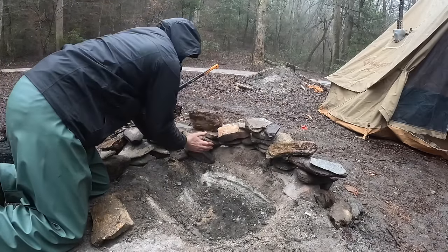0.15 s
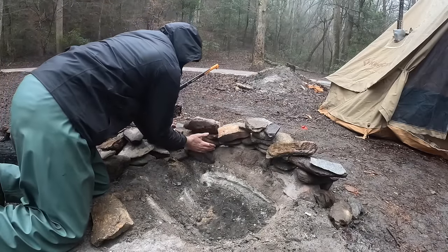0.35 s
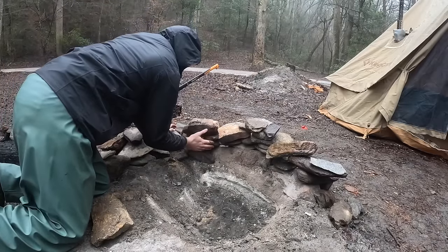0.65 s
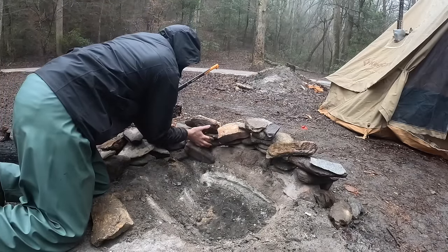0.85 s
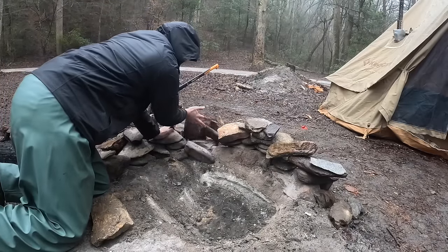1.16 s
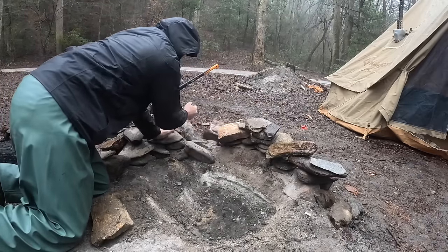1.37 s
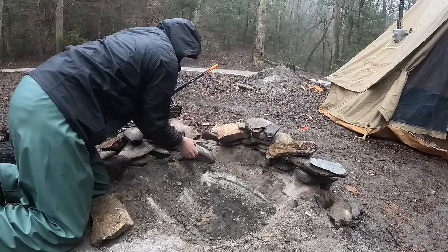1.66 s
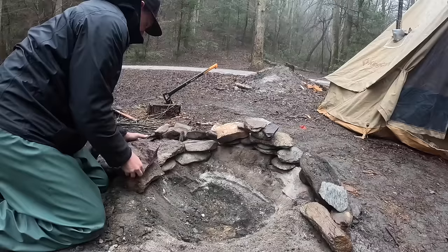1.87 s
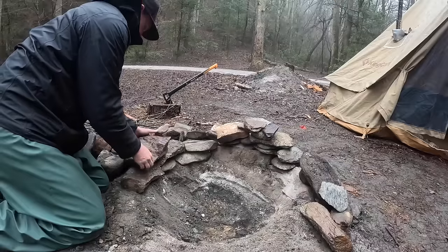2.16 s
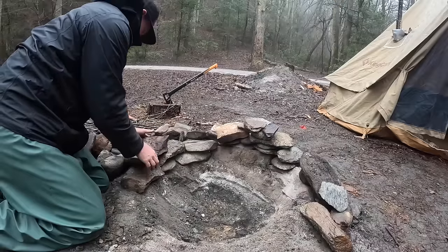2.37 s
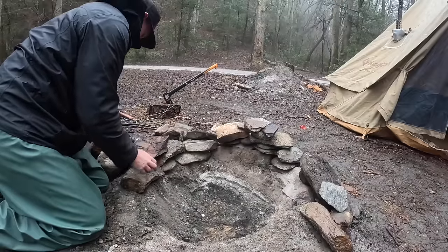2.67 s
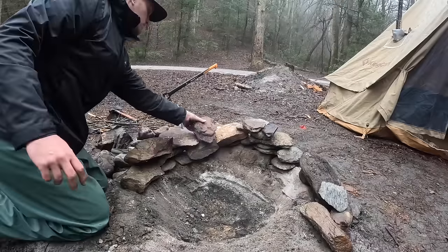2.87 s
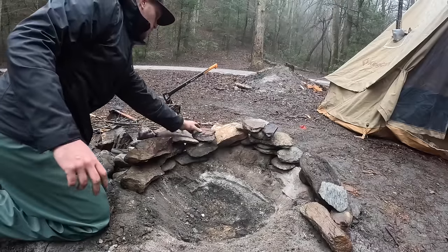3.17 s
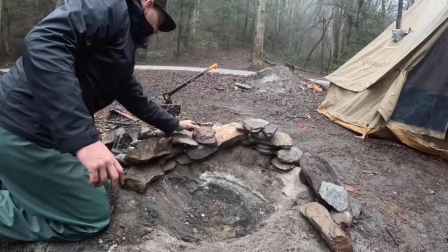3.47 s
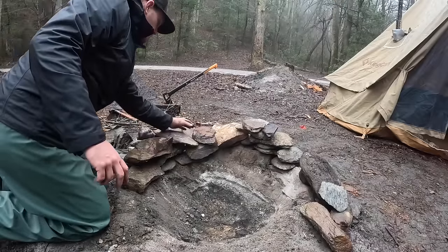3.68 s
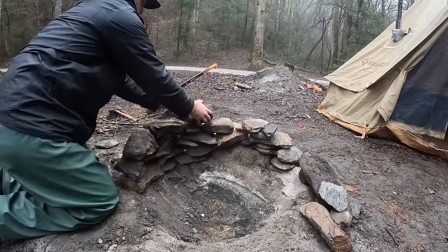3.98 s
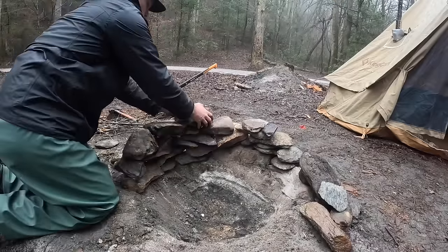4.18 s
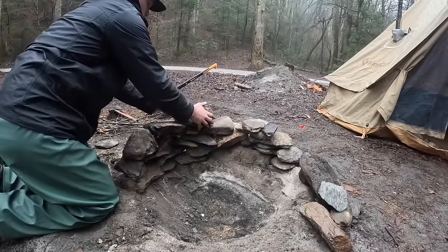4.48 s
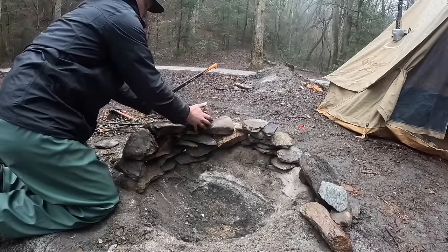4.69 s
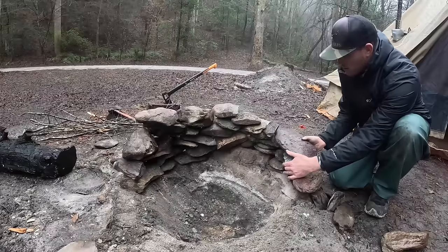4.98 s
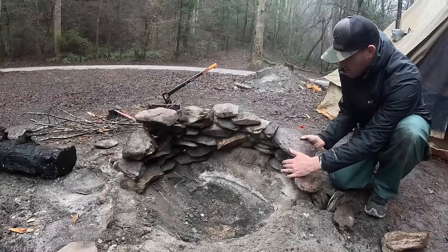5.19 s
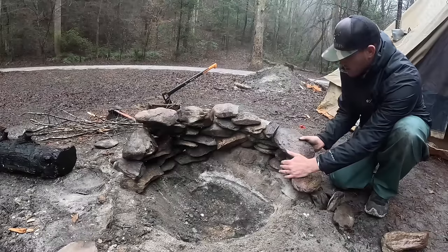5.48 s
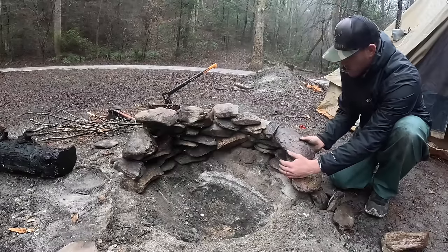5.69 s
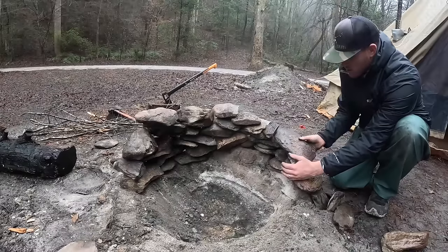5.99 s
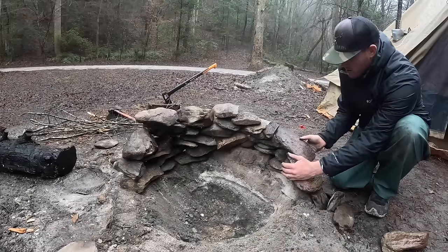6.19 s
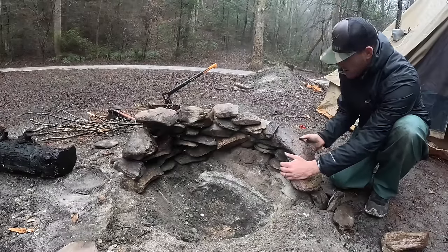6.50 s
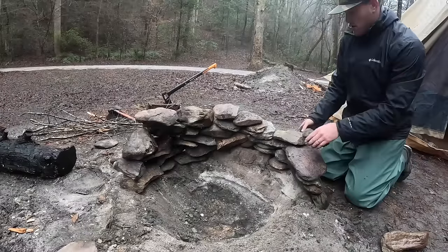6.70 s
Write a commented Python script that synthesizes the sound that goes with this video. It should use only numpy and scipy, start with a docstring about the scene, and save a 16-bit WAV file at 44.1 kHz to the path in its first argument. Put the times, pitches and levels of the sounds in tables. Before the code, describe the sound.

A close, dry outdoor stereo scene in a hushed forest with a faint steady wash. From 0.05 to 0.2 s flat stones strike with loud, hard clacks, grit and low earth thuds, while rain clothes swish. Another firm double clack comes at 0.43 s with a short scrape. From about 0.7 to 1.3 s a slab drags, gritty and stuttering, ringing briefly around 1.1-1.25 s with knocks at 1.16 s. A dense run of clacks follows from 1.34 to 1.6 s, the strongest near 1.47 s. After quiet cloth rustle, hollow clunks land at 2.26-2.3 s, with light touches to 2.7 s. A rattling cluster falls at 2.98-3.14 s, then small ticks. Stones clack again at 4.1-4.2 s. A clear thin bird chirp sounds at 4.73 s. From 4.86 s gravel crunches softly, with a low thump at 5.3 s, fading to near quiet and faint chirps.

```python
"""A quiet, damp forest: flat stones are set down, rocked and dragged on a low dry wall.
Impacts clack as brief pulses, crush grit and thud into the ground; a dragged slab scrapes by stick-slip
and sings in its modes. Rain clothes swish as shaped noise, and a small bird whistles gliding tones.
Sparse reflections answer from between the stones and from the trees."""
import sys
import numpy as np
from scipy import signal
from scipy.fft import rfft, irfft
from scipy.io import wavfile
from scipy.ndimage import uniform_filter1d

SR = 44100
rng = np.random.default_rng(int(sys.argv[2]) if len(sys.argv) > 2 else 0)


def materialize(psi):
    """Save the field psi as 16-bit PCM at rate SR to the path in sys.argv[1].

    A 1-D psi becomes a single channel; in a 2-D psi each row is a channel.
    """
    bounded = np.clip(np.atleast_2d(psi).T, -1, 1)
    quanta = np.round(bounded * 32767).astype(np.int16)
    wavfile.write(sys.argv[1], SR, quanta)


N = 302016
TIME = np.arange(N) / SR
# All table levels are relative: each layer sets its own balance.


def amp(db):
    """Logarithmic level: decibels to amplitude gain."""
    return 10 ** (np.asarray(db) / 20)


def unit(x):
    """Normalisation: scales to rms 1."""
    return x / np.sqrt(np.mean(x ** 2) + 1e-20)


def add(mix, start_s, sound):
    """Superposition: sums a sound into the mix from start_s."""
    part = mix[max(round(start_s * SR), 0):][:len(sound)]
    part += sound[:len(part)]


def colour(x, spectrum):
    """Spectral filtering: gains interpolated over log frequency, output at rms 1."""
    hz, level_db = np.transpose(spectrum)
    f = np.fft.rfftfreq(len(x), 1 / SR)
    gain = amp(np.interp(np.log(f + 1), np.log(hz), level_db))
    return unit(irfft(rfft(x) * gain, len(x)))


def hiss(size, lo_hz, hi_hz):
    """Band-limited noise at rms 1."""
    band = signal.butter(2, [lo_hz, min(hi_hz, SR / 2.2)], "band", fs=SR, output="sos")
    noise = rng.standard_normal(size * 2)
    return unit(signal.sosfilt(band, noise)[size:])  # the filter's start-up is dropped


def grains(per_s, spread_db):
    """Shot noise: random clicks of very unequal size."""
    size = amp(spread_db * np.minimum(rng.exponential(1, N), 4))
    return size * rng.choice([-1, 1], N) * (rng.random(N) < per_s / SR)


def drift(length, size):
    """Slow random modulation: twice-smoothed noise at rms 1, changing over about size samples."""
    smooth = uniform_filter1d(rng.standard_normal(length), size)
    return unit(uniform_filter1d(smooth, size))


def swell(t, peak_s):
    """Pulse envelope: a smooth rise to 1 at peak_s, then a fall that tends to exponential."""
    return (t / peak_s * np.exp(1 - t / peak_s)) ** 2


def strokes(rows, rise_s, sag_db_per_s, t60):
    """Energy summation of rows (start, length, level): each rises, sags steadily, then dies away."""
    power = np.zeros(N)
    for start_s, length_s, level_db in rows:
        t = np.maximum(TIME - start_s, 0)
        fall_db = sag_db_per_s * t + 60 * np.maximum(t - length_s, 0) / t60
        power += (np.minimum(t / rise_s, 1) * amp(level_db - fall_db)) ** 2
    return np.sqrt(power)


def echoes(x, t60, start_s, top_hz):
    """Reverberation: sparse, low-passed reflections of random sign with exponential decay."""
    t = np.arange(SR // 2) / SR
    arrivals = rng.choice([-1, 1], len(t)) * (rng.random(len(t)) < 2000 / SR)
    taps = arrivals * (t > start_s) * amp(-60 * t / t60)
    taps = taps / (np.linalg.norm(taps) + 1e-9)
    taps = signal.lfilter(*signal.butter(1, min(top_hz, SR / 2.2), fs=SR), taps)
    return signal.oaconvolve(x, taps)[:N]


def place(x, left_db, width_db):
    """Stereophony: a level difference, plus scatter of opposite sign in the two ears."""
    side = amp(width_db) * echoes(x, t60=0.022, start_s=.0005, top_hz=12000)
    return np.array([x * amp(left_db / 2) + side, x * amp(-left_db / 2) - side])


# Spectrum of the woods: pitch_hz [Hz], level_db [dB per Hz]
FOREST_SPECTRUM = [(25, -24), (60, -9), (110, -27), (165, -8), (290, -16), (480, -14.5), (780, -17.5),
                   (1090, -7.5), (1550, -9.5), (2400, -14.5), (7600, -23), (9900, -28), (11500, -46)]


def forest():
    """Stationary broadband noise: the steady, distant wash of the woods."""
    wash = colour(rng.standard_normal(N), FOREST_SPECTRUM)
    return place(amp(-57) * wash, left_db=0.5, width_db=-7)


# An arm or leg moves in rain clothes: start_s [s], length_s [s], level_db [dB]
SWISHES = [(-.08, 0.46, -47), (.42, 0.66, -52.5), (.72, 1, -50.5), (2.03, 0.25, -49), (2.73, 0.12, -46),
           (2.92, 0.2, -52), (3.41, 0.024, -51), (3.84, 0.35, -54), (5.1, 0.51, -59), (6.72, 0.13, -60)]
# Spectrum of the sliding cloth: pitch_hz [Hz], level_db [dB per Hz]
CLOTH_SPECTRUM = [(150, -3.5), (600, -2.5), (1100, 7), (2000, 6), (4000, 2.5), (7500, 1), (8300, -4.5),
                  (10200, -4), (11500, -28.5)]
SWISH_RISE_S, SWISH_SAG_DB_PER_S, SWISH_T60 = 0.042, 3.5, 0.76


def clothes():
    """Sliding friction: coated cloth hisses continuously, with fine impulsive crinkles."""
    weave = unit(rng.standard_normal(N)) + unit(grains(per_s=1800, spread_db=0.0))
    movement = strokes(SWISHES, SWISH_RISE_S, SWISH_SAG_DB_PER_S, SWISH_T60)
    return place(movement * colour(weave, CLOTH_SPECTRUM), left_db=2, width_db=-18.0)


# Weight leans on the wall or the ground: start_s [s], length_s [s], level_db [dB]
LEANS = [(-.03, 0.26, -40.5), (.91, 0.047, -46), (1.32, 0.097, -34), (1.76, 0.025, -49), (2.55, 0.2, -54),
         (3.42, 0.072, -48), (4.83, 0.64, -57), (5.55, 0.83, -65)]
# Spectrum of the rumbling soil: pitch_hz [Hz], level_db [dB per Hz]
GROUND_SPECTRUM = [(20, -19), (32, -6), (45, 9.5), (80, -1.5), (145, 5.5), (220, -1.5), (400, -19),
                   (1000, -44)]
LEAN_RISE_S, LEAN_SAG_DB_PER_S, LEAN_T60 = 0.012, 2, 0.6
# The soil's answer to thuds and drags
SHAKE_DB, SHAKE_RISE_S, SHAKE_T60, DRAG_SHAKE_DB = -20.5, 0.0089, 0.39, -8.5
# The loaded wall's own low rocking
ROCK_DB, ROCK_LO_HZ, ROCK_HI_HZ, ROCK_T60 = -21, 61, 104, 0.72


def ground(hollow):
    """Damped vibration: soil rumbles after thuds, under drags and leans; the wall rocks on longer."""
    t, rocking = np.arange(SR) / SR, np.zeros(N)
    leaning = strokes(LEANS, LEAN_RISE_S, LEAN_SAG_DB_PER_S, LEAN_T60)
    rumbling = leaning ** 2 + (amp(DRAG_SHAKE_DB) * hollow) ** 2  # powers add
    onset = np.minimum(t / SHAKE_RISE_S, 1)
    for start_s, *_, thud_db in KNOCKS:
        add(rumbling, start_s, (onset * amp(thud_db + SHAKE_DB - 60 * t / SHAKE_T60)) ** 2)
        add(rocking, start_s, (onset * amp(thud_db + ROCK_DB - 60 * t / ROCK_T60)) ** 2)
    soil = np.sqrt(rumbling) * colour(rng.standard_normal(N), GROUND_SPECTRUM)
    wall = np.sqrt(rocking) * hiss(N, ROCK_LO_HZ, ROCK_HI_HZ)
    return place(soil + wall, left_db=-1, width_db=-42.0)


def clack(t, hz, peak_s):
    """Contact pulse: a few cycles under a swell that peaks at peak_s."""
    return swell(t, peak_s) ** 1.52 * np.sin(2 * np.pi * hz * (t - peak_s))


RATTLE_DB, RATTLE_S, RATTLE_FALL_DB = -21.5, .026, 14


def rattle(t, hz, peak_s):
    """Repeated impact: a stone settles in five weaker touches, each at a pitch of its own."""
    out = np.zeros(len(t))
    for late, tone in rng.random(size=(5, 2)):
        touch = clack(t[:SR // 50], hz * 2 ** (1.44 * tone - .8), peak_s)
        add(out, 0.004022 + RATTLE_S * late, amp(-RATTLE_FALL_DB * late) * touch)
    return out


# Stone on stone: start_s [s], clack level_db [dB], clack pitch_hz [Hz], contact_ms (pulse peak) [ms],
# grit level_db [dB], hollow body level_db [dB], ground thud level_db [dB]
KNOCKS = [(0.0489, 1, 1790, 1.02, -62, -17, -21.5), (0.0547, -6, 2100, 1.4, -53, -23.5, -20),
          (0.092, -15, 980, 1.34, -65, -39, -24), (0.1094, -8, 1070, 0.97, -62, -22, -26),
          (0.1881, -11, 1600, 1.15, -49, -27.5, -37), (0.202, -18.5, 880, 0.95, -43, -15, -15.5),
          (0.4329, -2, 1570, 1.33, -62, -16, -28), (0.442, -6.5, 1250, 1.03, -60, -25, -17.5),
          (0.4622, -10, 1000, 1.64, -38, -15, -27), (0.5218, -21, 1090, 1, -53, -30, -21),
          (0.7377, -26.5, 1500, 0.88, -69, -25.5, -42), (0.7717, -31.5, 1290, 1.55, -49, -24.5, -41),
          (0.8628, -33, 1580, 1.1, -41, -18, -39), (0.9499, -54, 1250, 1.0, -38.5, -31, -19),
          (1.0706, -18.5, 950, 1.1, -52, -27, -49), (1.157, -10, 1320, 1.57, -59, -12, -20),
          (1.164, -3.5, 1270, 1.16, -59, -35, -20.5), (1.185, -25, 1100, 2.1, -53, -33, -25),
          (1.3375, -33, 2120, 1.15, -53, -25, -17), (1.3464, -10, 1200, 1, -38.5, -19, -24),
          (1.4236, -16, 1110, 1.3, -34.5, -28, -18), (1.4264, -2.5, 1080, 1.07, -57, -36, -12),
          (1.4495, -18, 1170, 0.99, -40, -25, -37), (1.4656, 3, 880, 0.66, -63, -19, -36),
          (1.521, -8.5, 1020, 2.03, -38, -11.5, -24.5), (1.5388, -14, 860, 0.76, -41.5, -22.5, -28.5),
          (1.5626, -8.5, 1100, 1.57, -39, -44, -47), (1.5875, -10.5, 1780, 1.1, -58, -44, -30.5),
          (2.2601, -5.5, 1200, 1.17, -41.5, -20, -16.5), (2.2737, -6, 1210, 1.22, -44.5, -7, -19),
          (2.279, -14, 960, 1.43, -55, -16.5, -15), (2.315, -11, 950, 0.42, -46, -21.5, -41),
          (2.4733, -26, 912, 0.46, -59, -33.5, -30.5), (2.4953, -33, 666, 0.37, -69, -27.5, -37),
          (2.5684, -42, 935, 1, -56, -28, -39), (2.6768, -37.5, 1010, 1.04, -56, -35, -34),
          (2.9817, -10, 930, 0.8, -27.5, -15, -50), (2.9935, -40, 1400, 0.83, -58, -13, -18.5),
          (2.9995, -10.5, 1660, 1.7, -62, -21, -24), (3.043, -9, 1780, 1.25, -60, -19, -39),
          (3.0567, -8.5, 1320, 0.71, -38, -8, -15.5), (3.083, -27, 900, 0.9, -40, -28.5, -28),
          (3.0996, -23, 1040, 1.34, -43, -10, -19.5), (3.1235, -24.5, 1590, 1.5, -60, -27, -40),
          (3.14, -33, 1360, 1.5, -50, -16.5, -24), (3.2951, -37.5, 2070, 1.27, -69, -34.5, -38.5),
          (4.1055, -6.5, 995, 1.94, -34, -16.5, -34), (4.1164, -13, 1220, 1.02, -51, -25, -45),
          (4.1219, -7, 1410, 1.1, -42, -19, -23), (4.1567, -31, 1000, 0.92, -46, -28, -34),
          (4.186, -20, 900, 1.37, -45, -18, -32.5), (5.3, -24, 1110, 1.9, -37, -37.5, -28),
          (5.6597, -32, 1240, 0.46, -52.5, -45, -69)]
# Spectrum of crushed grit: pitch_hz [Hz], level_db [dB per Hz]
GRIT_SPECTRUM = [(700, -12.5), (1500, 8), (2600, -1), (3600, 1), (5500, -7), (8000, -13), (11000, -23)]


def knocks():
    """Impact: a clack of a few cycles, crushed grit, a hollow note from the gaps, then the ground."""
    t = np.arange(SR // 4) / SR
    clacks, grit, low = np.zeros((3, N))
    for start_s, clack_db, hz, contact_ms, grit_db, body_db, thud_db in KNOCKS:
        peak_s = contact_ms / 1000
        # rough faces touch at many points
        chatter = swell(t, peak_s=1.76 * peak_s) * hiss(len(t), hz * 0.51, hz * 1.253)
        add(clacks, start_s, amp(clack_db) * (0.67 * clack(t, hz, peak_s) + 0.15 * chatter))
        if clack_db > -25:  # only a firm blow rattles
            add(clacks, start_s, amp(RATTLE_DB + clack_db / 2) * rattle(t, hz, peak_s))

        crush = swell(t, peak_s=0.0018) + 0.21 * swell(t, peak_s=0.0089)
        sand = rng.standard_normal(len(t)) * amp(rng.standard_normal(len(t)))
        add(grit, start_s - .0005, amp(grit_db + 8) * crush * colour(sand, GRIT_SPECTRUM))

        fall_hz = 175 + 380 * np.exp(-t / 0.0025)  # the note sinks as the weight comes down
        body = swell(t, peak_s=0.0015) * np.sin(2 * np.pi * np.cumsum(fall_hz) / SR)
        gaps = swell(t, peak_s=0.0068) * hiss(len(t), 358, 640)
        add(low, start_s, amp(body_db + 3.0) * (0.56 * body + 0.091 * gaps))

        thud_hz = 142 * amp(rng.standard_normal())
        thud = (1 - np.exp(-t / 0.0026)) * np.exp(-t / 0.0064) * np.sin(2 * np.pi * thud_hz * t)
        settle = swell(t, peak_s=0.025) * hiss(len(t), 35, 146)
        add(low, start_s + 0.0022, amp(thud_db) * (1.47 * thud + 0.18 * settle))
    # bounces among the stones
    between = amp(-10.0) * echoes(clacks, t60=0.064, start_s=0.002, top_hz=3000)
    bright = place(clacks + between + grit, left_db=-1.5, width_db=-17)
    return bright + place(low, left_db=0.1, width_db=-59.0)


# Stretches of a stone's drag over its neighbours, some joining into one long drag:
# start_s [s], length_s [s], gritty level_db [dB], hollow level_db [dB]
DRAGS = [(0.442, 0.093, -41.5, -34), (0.721, 0.088, -52, -36), (0.814, 0.14, -42.5, -34.5),
         (0.899, 0.12, -39.5, -36.5), (1.021, 0.24, -34.5, -31.5), (1.312, 0.015, -38, -46),
         (1.392, 0.17, -48, -39), (1.504, 0.09, -44.5, -35)]
DRAG_RISE_S, DRAG_SAG_DB_PER_S, DRAG_T60 = 0.013, 12.5, 0.25


def dragging():
    """Friction drive: the gritty and hollow strength of the drag over time."""
    start_s, length_s, *levels = np.transpose(DRAGS)
    return [strokes(zip(start_s, length_s, level_db), DRAG_RISE_S, DRAG_SAG_DB_PER_S, DRAG_T60)
            for level_db in levels]


def pebbles(per_s, count):
    """Modal micro-impacts: many small contacts ring for a moment at one of count pitches, at rms 1."""
    t, out = np.arange(SR // 25) / SR, np.zeros(N)
    for hz in np.geomspace(750, 6500, count) * rng.uniform(0.928, 1.05, count):
        envelope = (1 - np.exp(-t / .0004)) * np.exp(-t / .0022)
        tink = envelope * np.sin(2 * np.pi * hz * t) * np.sqrt(hz)
        for moment, size in rng.random((int(per_s * N / SR / count), 2)):
            add(out, moment * N / SR, amp(10.7 * size ** 2) * tink)
    return unit(out)


def resonate(x, hz, width_hz):
    """Resonance: a one-pole filter in a rotating frame follows the curve hz, at rms 1."""
    turn = np.exp(2j * np.pi * np.cumsum(hz) / SR)
    r = np.exp(-np.pi * width_hz / SR)
    return unit((turn * signal.lfilter([1 - r], [1, -r], x / turn)).real)


# Resonances of the stones beneath: pitch_hz [Hz], width_hz [Hz], level_db [dB]
WALL_MODES = [(967, 75, 0.5), (1165, 60, -4.5), (1554, 70, 2.5), (2700, 160, -5), (3260, 41, -11),
              (3650, 49, -9)]
WALL_WANDER, WALL_PATCHY_DB = 0.027, 7  # rms wander as a fraction of pitch, rms level change in dB
# The large stone pressed and twisted into gravel: start_s [s], length_s [s], level_db [dB]
PRESSES = [(4.86, 0.19, -55.5), (5.15, 0.17, -49), (5.36, 0.024, -49), (5.455, 0.087, -51),
           (5.6, 0.72, -63)]
PRESS_RISE_S, PRESS_SAG_DB_PER_S, PRESS_T60 = 0.0081, 2, 0.15
# Filters for scraped sand, the hollow layer and gravel: pitch_hz [Hz], level_db [dB]
SCRAPE_SPECTRUM = [(500, -23), (800, -4), (1050, 3.5), (1600, 3), (2000, 0), (3700, 0.5), (5500, -3),
                   (7700, 0.5), (8300, -3.5), (10300, -3), (11800, -30)]
HOLLOW_SPECTRUM = [(60, -32), (150, 6), (300, -3), (480, 2), (620, -3), (800, -37), (1500, -51)]
GRAVEL_SPECTRUM = [(300, -22), (900, -5), (1600, 1), (2200, 5), (3200, -2.5), (4500, -10.5), (10000, -11)]


def scrapes(gritty, hollow):
    """Stick-slip: grit breaks under a catching stone; wall modes come and go as the contact travels."""
    catch = amp(2 * drift(N, size=130))
    breaking = unit(grains(per_s=6800, spread_db=4)) + 0.78 * pebbles(per_s=5000, count=48)
    sand = colour(breaking, SCRAPE_SPECTRUM)
    sung = np.zeros(N)
    for hz, width_hz, level_db in WALL_MODES:
        strength = amp(level_db + WALL_PATCHY_DB * drift(N, size=900))
        wander_hz = hz * (1 + WALL_WANDER * drift(N, size=1800))
        sung += strength * resonate(sand, wander_hz, width_hz)
    drag = gritty * (amp(-1.0) * sand + amp(-2.5) * unit(sung))
    drag += amp(-4.5) * hollow * colour(grains(per_s=1400, spread_db=4.0), HOLLOW_SPECTRUM)

    crackle = unit(grains(per_s=700, spread_db=5.5)) + 1.25 * pebbles(per_s=1300, count=40)
    pressing = strokes(PRESSES, PRESS_RISE_S, PRESS_SAG_DB_PER_S, PRESS_T60)
    gravel = pressing * colour(crackle, GRAVEL_SPECTRUM)
    dragged = place(catch * drag, left_db=-0.8, width_db=-22.0)
    return dragged + place(catch * gravel, left_db=-3.0, width_db=-8.0)


# Chips and pebbles snapping: start_s [s], level_db [dB], pitch_hz (sets the noise band) [Hz]
TICKS = [(.477, -22.5, 4300), (0.8625, -17.5, 5100), (1.206, -28, 5200), (2.47, -42, 8540),
         (3.2383, -39, 3300), (3.57, -35, 5470), (3.594, -40, 4760), (4.024, -35.5, 3120),
         (4.05, -32, 3500), (4.1697, -28.5, 4700), (4.203, -32.5, 5100), (4.864, -42, 6460),
         (5.2698, -33.5, 3220), (5.5047, -34.5, 2740), (5.84, -40, 4840)]


def ticks():
    """Brittle fracture: small chips give short, bright bursts of noise."""
    t, out = np.arange(SR // 16) / SR, np.zeros(N)
    snap = swell(t, peak_s=0.0018) + 0.11 * swell(t, peak_s=0.012)
    for start_s, level_db, hz in TICKS:
        add(out, start_s + 0.0006, amp(level_db - 4.0) * snap * hiss(len(t), hz * 0.41, hz * 1.25))
    return place(out, left_db=2, width_db=-16.5)


# The slab set singing by a slip or a blow: start_s [s], length_s of contact [s], pitch_hz [Hz], level_db [dB]
SLIPS = [(0.5, 0.048, 1575, -40), (0.74, 0.0043, 1607, -35.5), (1.041, 0.16, 1530, -38),
         (1.109, 0.022, 1547, -22.5), (1.156, 0.0031, 1555, -15.5), (1.232, 0.0085, 1534, -20),
         (1.566, 0.0018, 1546, -28), (1.587, 0.0024, 1548, -17), (1.647, 0.013, 1570, -38.5)]
# Modes of that slab: ratio to its pitch [1], level_db [dB], t60_s [s]
SLAB_MODES = [(.72, -12, 0.05), (0.999, 2.5, 0.081), (1.701, -16.5, 0.16)]


def slab():
    """Modal vibration: modes build up unevenly during a slip, then ring on; the load shifts their pitch."""
    t, out = np.arange(SR // 3) / SR, np.zeros(N)
    for start_s, length_s, hz, level_db in SLIPS:
        note = 0
        after_s = np.maximum(t - length_s, 0)
        touching = np.exp(-after_s / .02)
        for ratio, mode_db, t60 in SLAB_MODES:
            build = np.minimum(t / length_s, 1) * amp(mode_db - 60 * after_s / t60)
            jitter = .025 * touching * drift(len(t), size=70)
            judder = amp(3 * touching * drift(len(t), size=90))
            phase = 2 * np.pi * np.cumsum(hz * ratio * (1 + jitter)) / SR
            note = note + build * judder * np.sin(phase)
        add(out, start_s, amp(level_db) * note)
    return place(out, left_db=-0.5, width_db=-30)


# An edge rubbing briefly over a neighbour: start_s [s], length_s [s], pitch_hz (band centre) [Hz],
# width_hz [Hz], level_db [dB]
RUBS = [(0.513, 0.055, 3560, 400, -43.5), (0.886, 0.021, 3700, 400, -35), (1.176, 0.027, 7570, 582, -37),
        (1.265, 0.022, 2850, 304, -32), (1.325, 0.018, 4400, 3650, -34), (2.32, 0.035, 3340, 280, -44.5),
        (2.319, 0.039, 1730, 150, -46), (3.078, 0.024, 5370, 5000, -44), (3.132, 0.076, 3350, 150, -52.5),
        (3.566, 0.033, 5540, 3530, -41), (4.025, 0.054, 5740, 4000, -49.5),
        (4.104, 0.022, 2490, 348, -30.5), (4.1705, 0.0044, 9500, 900, -35.5),
        (4.997, 0.046, 3380, 400, -50.5), (5.197, 0.014, 2880, 600, -40.5), (5.46, 0.085, 2220, 220, -52)]


def rubs():
    """Friction-driven resonance: a rough edge judders and keeps one resonance of the stone alive."""
    out = np.zeros(N)
    for start_s, length_s, hz, width_hz, level_db in RUBS:
        size = int(length_s * SR)
        unsteady = unit(uniform_filter1d(rng.standard_normal(size), size=130))
        judder = unit(amp(4.3 * unsteady))
        tone = hiss(size, max(hz - width_hz / 2, 100), hz + width_hz / 2)
        add(out, start_s, amp(level_db) * judder * signal.windows.tukey(size, .6) * tone)
    return place(out, left_db=1.5, width_db=-17)


# Bird calls: start_s [s], length_s [s], pitch_hz (reached by the scoop) [Hz], level_db [dB]
CHIRPS = [(0.702, 0.03, 7230, -52.5), (2.481, 0.046, 7130, -56), (3.299, 0.031, 7520, -55.5),
          (4.734, 0.032, 7190, -40), (5.742, 0.016, 7250, -56), (6.04, 0.026, 7460, -56.5),
          (6.298, 0.011, 7230, -54), (6.357, 0.015, 7330, -52)]


def bird():
    """Frequency modulation: thin whistles scoop up towards their pitch and linger between the trees."""
    out = np.zeros(N)
    for start_s, length_s, hz, level_db in CHIRPS:
        t = np.arange(int(length_s * SR)) / SR
        pitch = hz * (1 - 0.18 * np.exp(-t / 0.0035) + 0.013 * np.sin(2 * np.pi * 65 * t))
        whistle = signal.windows.tukey(len(t), .7) * np.sin(2 * np.pi * np.cumsum(pitch) / SR)
        add(out, start_s, amp(level_db) * whistle)
    trees = amp(-10.5) * echoes(out, t60=0.36, start_s=0.017, top_hz=12000)
    return place(out + trees, left_db=13.5, width_db=-5)


# Faint low bumps of a resonance around 140-200 Hz: start_s [s], length_s [s], level_db [dB]
LOW_BUMPS = [(5.21, 0.15, -47), (5.6, 0.78, -68), (6.51, 0.12, -58)]


def bedding():
    """Damped low resonance: soft ground booms with a sagging note; a band at 140-200 Hz bumps faintly."""
    t, out = np.arange(SR // 2) / SR, np.zeros(N)
    sag_hz = 78 + 36 * np.exp(-t / 0.065) + 12 * drift(len(t), size=250)
    note = np.sin(2 * np.pi * np.cumsum(sag_hz) / SR)
    add(out, 5.318, amp(-30.5) * (1 - np.exp(-t / 0.004)) * np.exp(-t / 0.065) * note)
    bumps = unit(amp(6.3 * drift(N, size=1100)) * hiss(N, 137, 198))
    return out + bumps * strokes(LOW_BUMPS, LEAN_RISE_S, LEAN_SAG_DB_PER_S, t60=0.16)


def scene():
    """Superposition: stone work and its faint answer from the trees, with clothes, bird and forest."""
    gritty, hollow = dragging()
    stones = knocks() + ticks() + rubs() + slab()
    stones = stones + scrapes(gritty, hollow) + ground(hollow) + bedding()
    trees = np.array([echoes(ear, t60=0.75, start_s=0.014, top_hz=4000) for ear in stones])
    return stones + amp(-27.5) * trees + clothes() + bird() + forest()


EDGE_HZ = 11600


def record(dry):
    """Band limitation: a linear-phase low-pass at EDGE_HZ."""
    low_pass = signal.firwin(401, EDGE_HZ, window=("kaiser", 8), fs=SR)
    return signal.oaconvolve(dry, low_pass[None], "same")


dry = scene()
out = record(dry)
materialize(out)
```